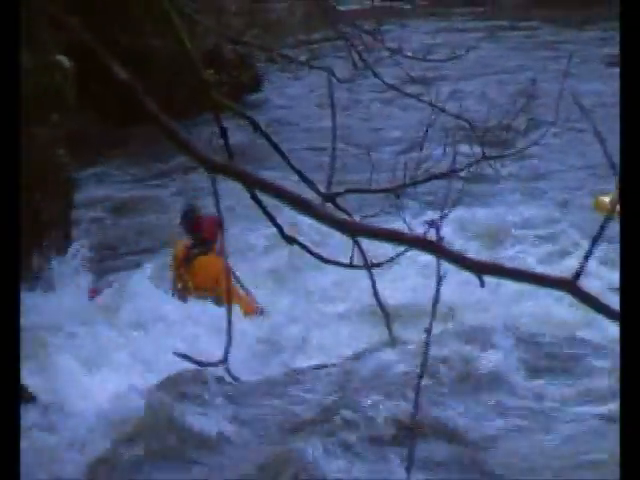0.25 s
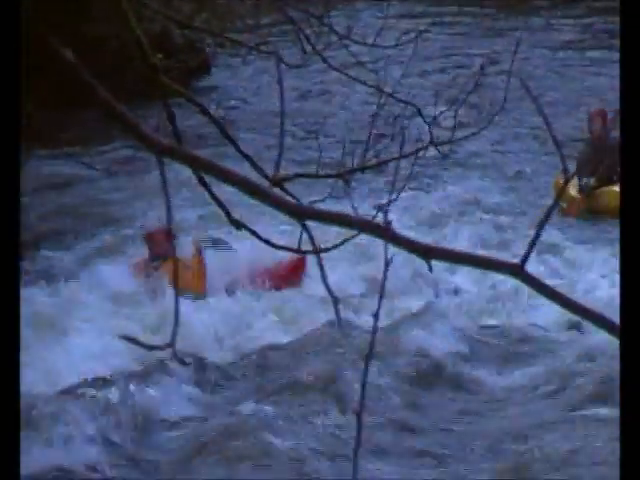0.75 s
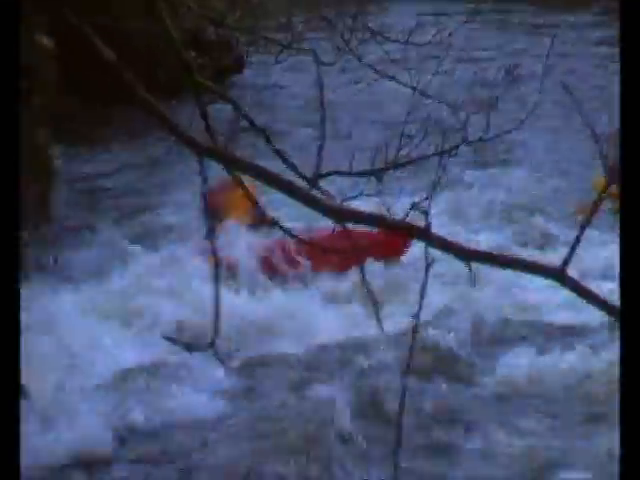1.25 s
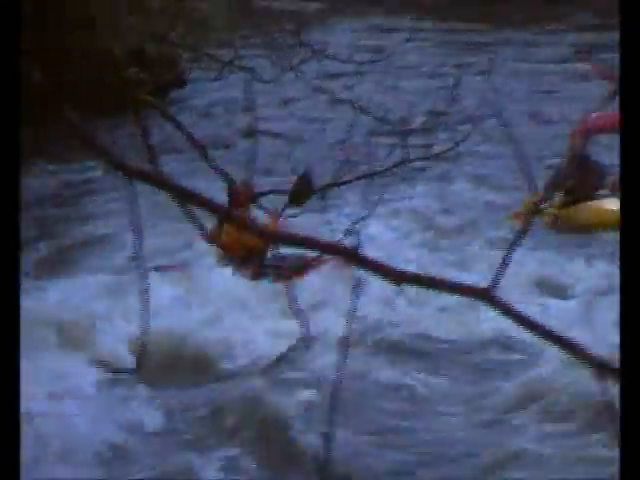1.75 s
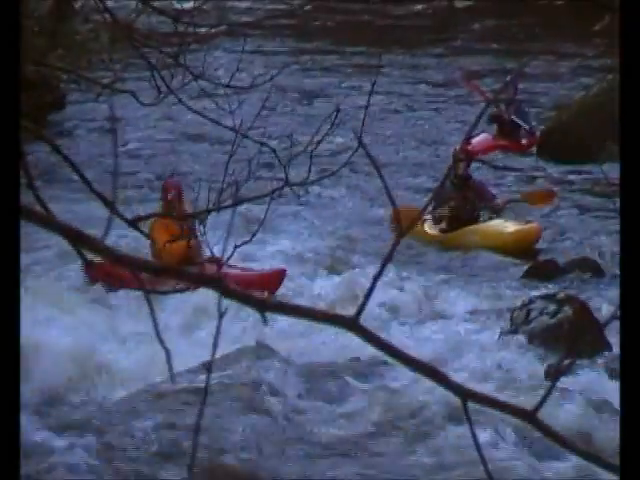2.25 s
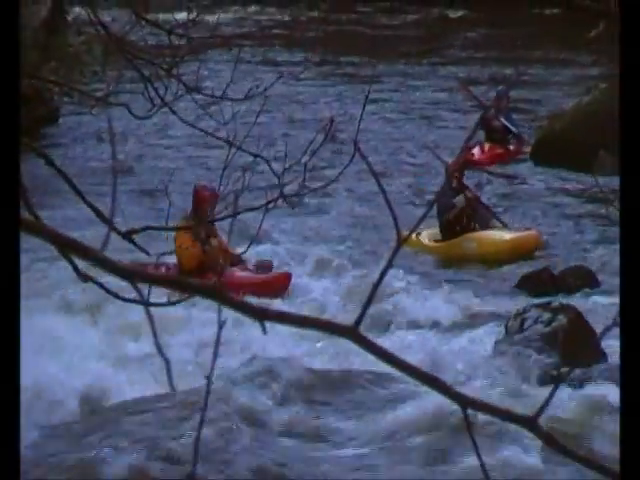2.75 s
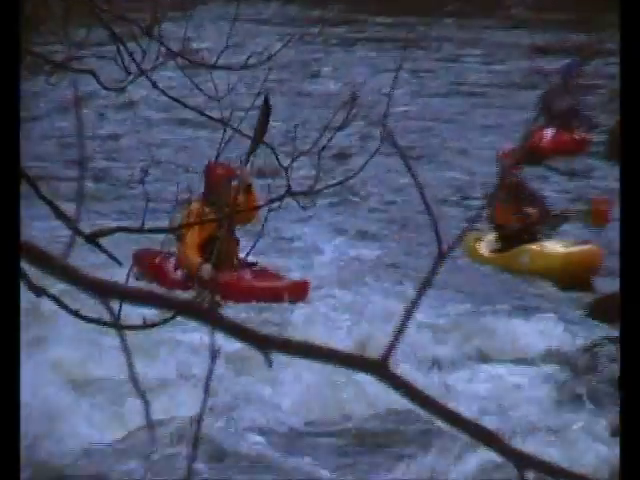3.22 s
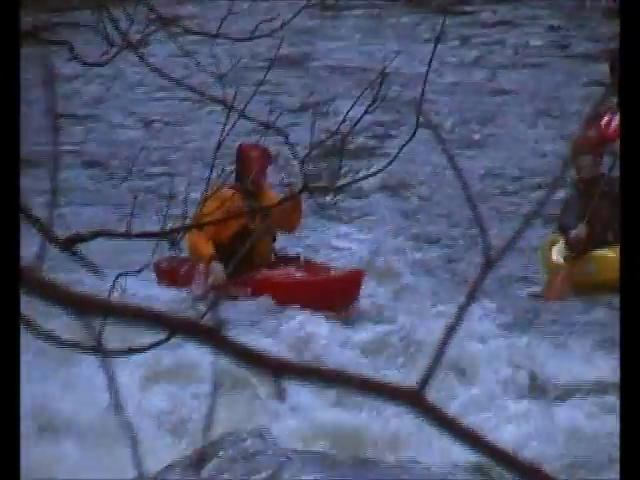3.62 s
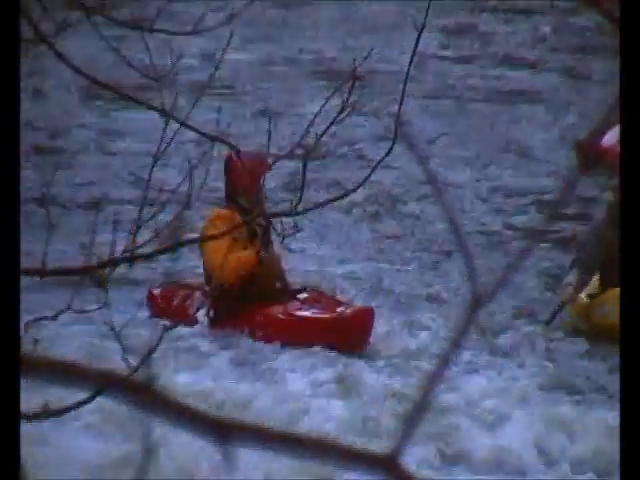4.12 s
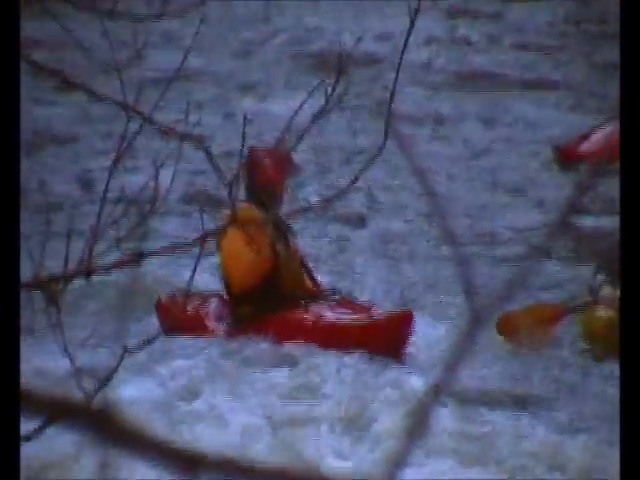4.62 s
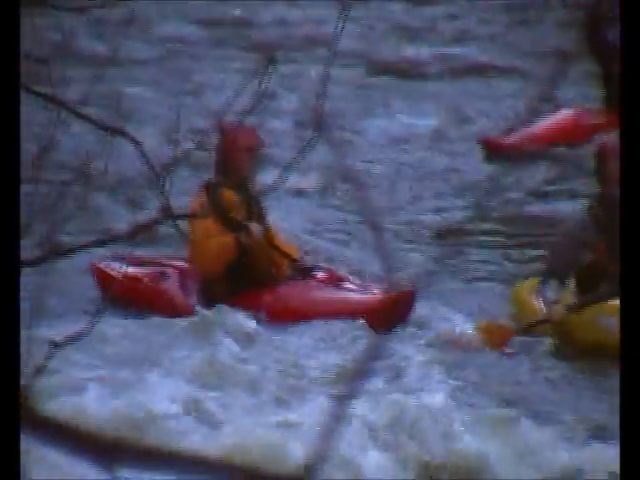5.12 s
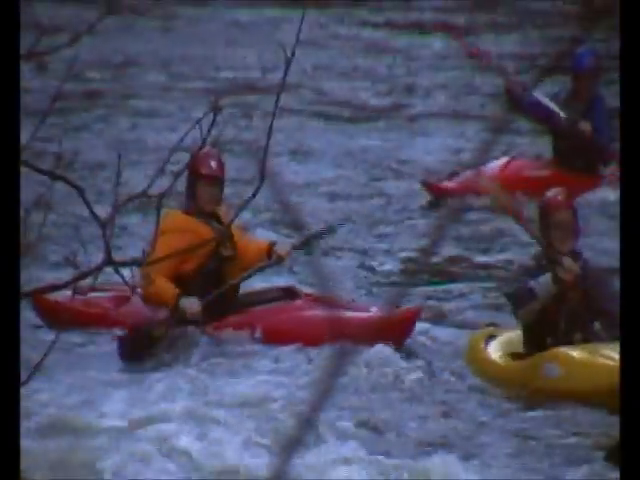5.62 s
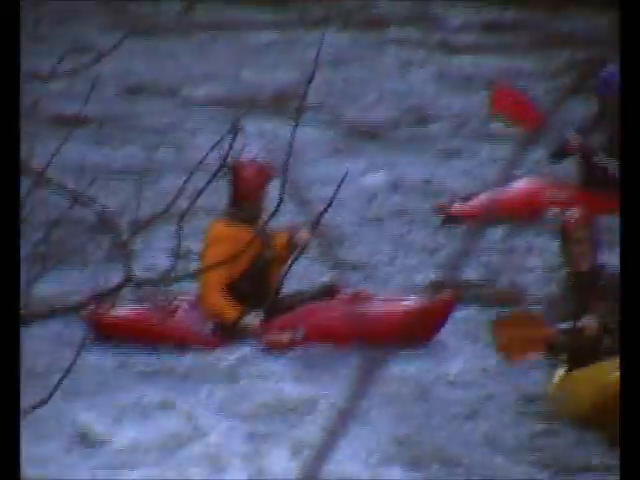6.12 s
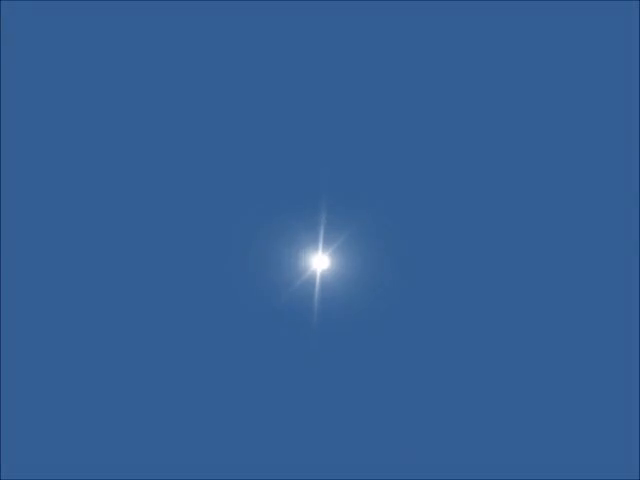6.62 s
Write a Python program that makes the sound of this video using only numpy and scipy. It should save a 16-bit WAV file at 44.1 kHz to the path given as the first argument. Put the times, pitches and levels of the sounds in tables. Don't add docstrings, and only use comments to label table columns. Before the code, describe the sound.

Loud, steady roar of river rapids close by, with low slaps on rock and small splashes, then cut dead to silence.

```python
import sys
import numpy as np
from scipy import signal
from scipy.io import wavfile
from scipy.ndimage import uniform_filter1d, map_coordinates

SR = 44100
rng = np.random.default_rng(int(sys.argv[2]) if len(sys.argv) > 2 else 0)


def gain_from_decibels(decibels):
    exponent = np.asarray(decibels, float) / 20
    return 10 ** exponent


def bounce(signal):
    frames = np.transpose(np.atleast_2d(signal))
    limited = np.clip(frames, -1, 1)
    pcm = np.round(limited * 32767).astype(np.int16)
    wavfile.write(sys.argv[1], SR, pcm)


N = 302959


def evened(x):
    return x / np.sqrt(np.mean(x ** 2) + 1e-20)


def spectrum_at(points, hz, col=1):
    rows = np.array(points)
    return np.interp(np.log(hz + 1), np.log(rows[:, 0] + 1), rows[:, col])


def bubbles(per_s, spread_db, cycles, rise):
    out = np.zeros((2, N))
    pitches = np.geomspace(120, 11000, num=30)
    strength_db = spread_db * np.minimum(rng.exponential(1, (2, N)), 5)
    strength = gain_from_decibels(strength_db) * rng.choice([-1, 1], (2, N))
    draw = rng.random((2, N)) * SR / per_s
    commonness = np.sqrt(pitches)
    edges = np.cumsum(np.r_[0, commonness]) / commonness.sum()
    for k, hz in enumerate(pitches):
        u = np.arange(int(4 * cycles * SR / hz)) * hz / SR
        ring = np.sin(2 * np.pi * u * (1 + rise * u / cycles))
        ring *= np.exp(-u / cycles) * (1 - np.exp(-3 * u))
        ring *= hz ** 0.27 / np.linalg.norm(ring)
        born = (draw >= edges[k]) & (draw < edges[k + 1])
        out += signal.oaconvolve(strength * born, ring[None])[:, :N]
    return evened(out)


def bumps(t, at_s, half_s):
    return np.exp(-((t - at_s[:, None]) / half_s[:, None]) ** 2)


def heaving(hz, t):
    heave = uniform_filter1d(rng.standard_normal((len(t), 6)), size=9, axis=0)
    heave = evened(uniform_filter1d(heave, size=9, axis=0))
    octave = np.clip(np.log2((hz + 1) / 60), 0, 5)
    grid = np.meshgrid(octave, np.arange(len(t)), indexing="ij")
    low = 1 / (1 + (hz / 1090) ** 4)[:, None]
    return 0.5 * low * map_coordinates(heave.T, grid, order=1)


def surging(hz, t):
    # centre in seconds, swell in dB, half length in seconds, centre frequency in Hz.
    surges = [(.05, -4, .15, 120), (0.35, -2, .12, 200), (.63, 5.5, .1, 130), (0.749, 0.5, 0.33, 1000),
              (1.13, 1, .08, 330), (0.899, 2.5, .1, 190), (1.3, 1, .15, 250), (1.5, 1, .07, 220),
              (3.3, 0, .18, 400), (5.6, 1, .15, 220), (5.551, 1, .1, 220), (6.25, 2, 0.066, 400),
              (4.201, -1, 0.16, 400), (3.3, 3.5, .15, 99), (1.3, -2, .1, 68), (6.15, 1.5, .12, 360),
              (0.9, 2, .12, 560), (3.4, 0, 0.1, 870), (2.3, 1.5, 0.11, 400), (1.35, 4.5, .12, 110),
              (1.528, 1.5, .1, 670), (1.76, 3.5, .1, 200), (1.96, -1, .07, 110), (2.1, -0.5, .1, 330),
              (2, 3.5, .1, 200), (3.5, -2.5, 0.25, 300), (3.153, 0.5, .12, 750), (3.377, -3, .07, 750),
              (3.72, 1.5, .2, 750), (4.4, 1.5, .1, 250), (4.08, 0.5, .06, 110), (4.201, 3.5, 0.13, 300),
              (4.1, 2.5, .12, 100), (5.9, -2, 0.16, 750), (6, 5, .08, 110), (6.6, 2, .08, 750),
              (5.35, -3, 0.11, 300), (6.8, 0, .09, 110), (6.1, -1.5, .08, 330), (7, -2.5, 0.34, 100),
              (6.35, -2, .1, 750), (.58, 1.5, .14, 400), (3.75, 2, .15, 390), (4.98, -1.5, .14, 270),
              (1.7, -1, .12, 300), (2.95, 1.5, .12, 360), (6.12, 1.5, .1, 270), (.95, -0.5, .12, 1000)]
    # centre in seconds, swell in dB, half length in seconds.
    spray = [(.57, 1, 0.054), (.76, 0, 0.045), (1.102, 0.5, .04), (1.8, 0.8, 0.06), (2.952, 1.5, 0.029),
             (2.295, -0.7, 0.097), (2.701, 1.5, 0.11), (3.34, -1, .15), (3.94, 1, .04), (4.12, 1.5, 0.043),
             (4.45, 0.2, .1), (5.6, 0.5, 0.071), (6.05, 0.5, .04), (6.254, -0.5, .06)]
    surge_s, surge_db, surge_half_s, centre_hz = np.transpose(surges)
    surge_octaves = 0.76
    reach = np.exp(-(np.log2((hz[:, None] + 1) / centre_hz) / surge_octaves) ** 2)
    low_db = (reach * surge_db) @ bumps(t, surge_s, surge_half_s)
    spray_s, spray_db, spray_half_s = np.transpose(spray)
    high = 1 / (1 + (920 / (hz + 1)) ** 4)[:, None]
    high_db = high * (spray_db @ bumps(t, spray_s, spray_half_s))
    return low_db + heaving(hz, t) + high_db


def ports(hz, z):
    # frequency in Hz, spectrum level in dB per Hz.
    left_colour = [(30, -31.5), (60, -10), (160, -3.2), (210, -0.3), (290, 1.4), (360, 0.7), (580, -4),
                   (800, -2.5), (1150, -3), (1350, -5.5), (1950, -6.5), (2400, -8.5), (2950, -9),
                   (4800, -12), (5800, -11.5), (7200, -13.5), (9000, -13), (10500, -15.5), (11300, -19),
                   (11800, -28), (12200, -34.5), (13000, -46)]
    # frequency in Hz, spectrum level in dB per Hz.
    right_colour = [(30, -17), (160, -2.5), (210, 0.5), (290, 3), (370, 2), (460, 2), (650, -4), (820, 1),
                    (950, -3.5), (1100, -6.5), (1280, -12), (1550, -7.5), (1880, -4), (2150, -7.5),
                    (2400, -9.5), (2650, -13.5), (3000, -11.5), (3700, -10.5), (6000, -16), (8500, -23),
                    (9800, -26.5), (10500, -34.5), (11300, -36.5), (12500, -47)]
    # frequency in Hz, coherence from 0 to 1, left lead in radians.
    likeness = [(30, .88, .04), (200, .98, .11), (400, .97, .25), (620, .82, .9), (800, .83, 1.),
                (920, .55, 1.9), (1010, .15, 3.), (1060, .15, 4.3), (1200, .5, 6.3), (1300, .4, 5.85),
                (1680, .7, 5.85), (2000, .54, 6.85), (2200, .62, 6.5), (2400, .7, 6.9), (2600, .38, 6.6),
                (2900, .68, 6.35), (3250, .64, 6.75), (3500, .43, 6.6), (4200, .56, 6.45), (5200, .8, 7.),
                (7000, .76, 7.55), (9000, .64, 7.75), (10000, .42, 7.8), (11000, .1, 7.8)]
    same = np.clip(spectrum_at(likeness, hz), 0, 1)[:, None]
    lag = np.exp(-1j * spectrum_at(likeness, hz, col=2))[:, None]
    right = same * lag * z[0] + np.sqrt(1 - same ** 2) * z[1]
    left = z[0] * gain_from_decibels(spectrum_at(left_colour, hz))[:, None]
    right = right * gain_from_decibels(spectrum_at(right_colour, hz))[:, None]
    pair = np.array([left, right])
    return evened(signal.istft(pair, SR, nperseg=1024, noverlap=768)[1][:, :N])


def river():
    share = 0.14
    foam = np.sqrt(1 - share) * rng.standard_normal((2, N))
    foam += np.sqrt(share) * bubbles(per_s=9000, spread_db=3.5, cycles=2.5, rise=0.081)
    hz, t, z = signal.stft(foam, SR, nperseg=1024, noverlap=768)
    z /= np.sqrt(uniform_filter1d((abs(z) ** 2).mean((0, 2)), size=7))[:, None]
    patches = rng.standard_normal((len(t), len(hz))).T
    patches = uniform_filter1d(patches, size=12, axis=0)
    patches = evened(uniform_filter1d(patches, size=6, axis=1))
    flicker = evened(uniform_filter1d(rng.standard_normal(len(t)), size=3))
    return ports(hz, z * gain_from_decibels(surging(hz, t) + 0.5 * patches + 0.35 * flicker))


def ticks():
    # time in seconds, peak level in dB, right minus left in dB.
    drops = [(.3075, -8, -6), (.5614, -9, -6), (1.0998, -8, -6), (1.1736, -3, -8), (1.8566, -9, -6),
             (2.928, -9, -6), (2.9532, -8, -6), (2.977, -4, -7), (2.9892, -8, -6), (3.9566, -7, -5),
             (4.1359, -9, -6), (4.7711, -5, -7), (5.453, -11, -6), (5.6041, -8, -6), (5.8552, -7, -6),
             (6.0693, -8, -6)]
    out = np.zeros((2, N))
    t = np.arange(-40, 80) / SR
    snap = np.cos(2 * np.pi * 6000 * t) * np.exp(-abs(t) / 0.0003)
    for s, db, right_db in drops:
        at = round(s * SR) - 40
        out[:, at:at + len(t)] += gain_from_decibels(np.array([[db], [db + right_db]])) * snap
    return out


def slaps():
    # time in seconds, peak level in dB, pitch in Hz.
    pockets = [(0.614, -1.5, 385), (0.726, -3, 407), (.8576, -9, 390), (1.1366, -7, 339), (1.173, -9, 326),
               (1.3205, -3, 329), (1.85, 0, 328), (2.3791, -6.5, 357), (2.8314, -8.5, 351),
               (3.074, -10, 405), (3.458, -7, 390), (3.9018, -9, 384), (3.949, -5, 366), (4.135, -10, 309),
               (4.6995, -6, 351), (4.8057, -4, 327), (4.9474, -7, 379), (5.403, -9, 291),
               (5.788, -3.5, 240), (5.901, -2, 332), (6.405, -3, 296)]
    out = np.zeros(N)
    for s, db, hz in pockets:
        u = np.arange(-400, 400) * hz / SR
        at = round(s * SR) - 400
        out[at:at + 800] -= gain_from_decibels(db - 6.0) * np.cos(2 * np.pi * u) * np.exp(-(u / 0.74) ** 2)
    return out


def scene():
    slap_balance = gain_from_decibels(np.array([[-.5], [.5]]))
    return gain_from_decibels(-13.5) * river() + slaps() * slap_balance + ticks()


def gain_control_db(trips, creep_db_per_s):
    drop_s = 0.035
    t, held_db = np.arange(N) / SR, np.zeros(N)
    for s, db in trips:
        owed_db = held_db[round(s * SR)] + db * np.clip((t - s) / drop_s, 0, 1)
        recovering_db = np.maximum(owed_db - creep_db_per_s * (t - s), 0)
        held_db = np.where(t > s, recovering_db, held_db)
    return -held_db


def port_gains():
    # time in seconds, drop in dB.
    left_trips = [(.175, 1), (.776, 0.5), (1.174, 1.5), (1.852, -1.5), (1.917, 2), (2.512, 2), (2.985, 1.5),
                  (3.955, 1.9), (4.136, 1.2), (4.948, 0), (5.453, 1), (6.069, 3)]
    # time in seconds, drop in dB.
    right_trips = [(0.005, 0.85), (.175, 1.3), (1.85, 3.1), (1.95, 0.62), (2.99, 0.39), (3.998, 0.74),
                   (4.157, 1.1), (5.801, 2.5)]
    return gain_from_decibels(np.array([gain_control_db(left_trips, 6.5), gain_control_db(right_trips, 3)]))


def thinned(x):
    hz, t, z = signal.stft(x, SR, window="cosine", nperseg=2048, noverlap=1024)
    jumps = np.floor(0.55 * rng.exponential(1, len(t)) ** 1.3)
    edge_hz = 11750 + 170 * jumps
    kept = z * (hz[:, None] < edge_hz)
    return signal.istft(kept, SR, window="cosine", nperseg=2048, noverlap=1024)[1][:, :N]


def low_pass(x):
    return signal.sosfilt(signal.butter(12, 16000, fs=SR, output="sos"), x)


def record(dry):
    cut_s, fade_s = 6.4577, 0.00008
    t = np.arange(N) / SR
    x = signal.sosfilt(signal.butter(3, 38, "high", fs=SR, output="sos"), dry)
    x = x * port_gains()
    x = 1.8 * np.tanh(x / 1.8)
    x = thinned(np.clip(x, -.97, .97))
    x = x * np.clip((cut_s - t) / fade_s, 0, 1)
    return low_pass(x)


dry = scene()
out = record(dry)
bounce(out)
```